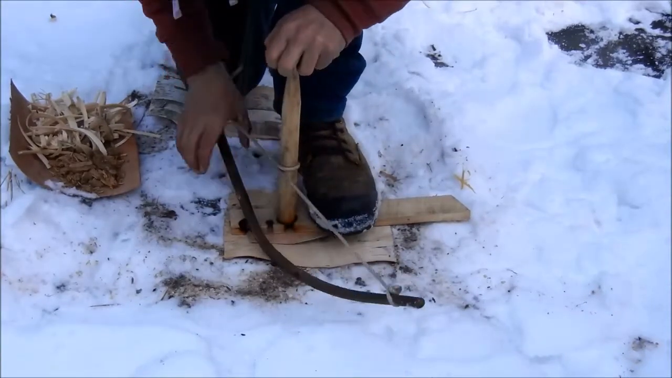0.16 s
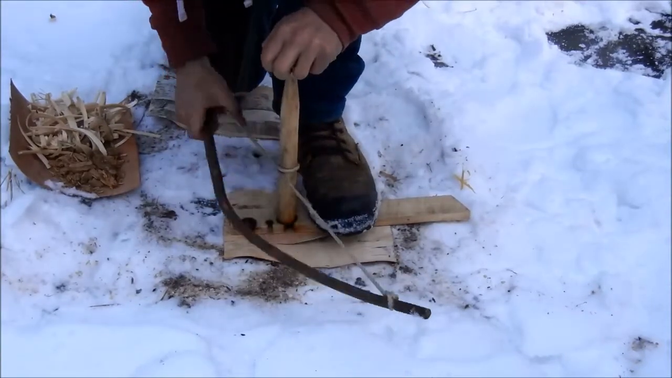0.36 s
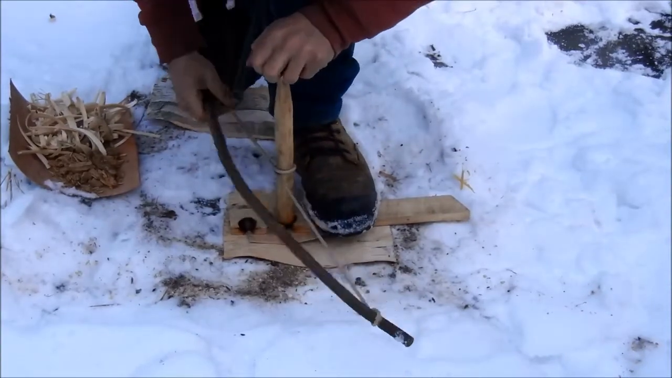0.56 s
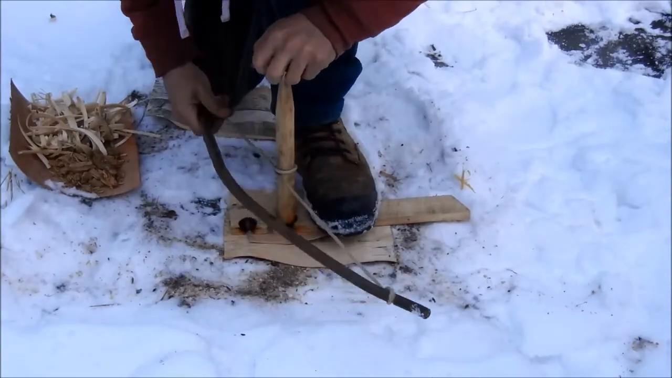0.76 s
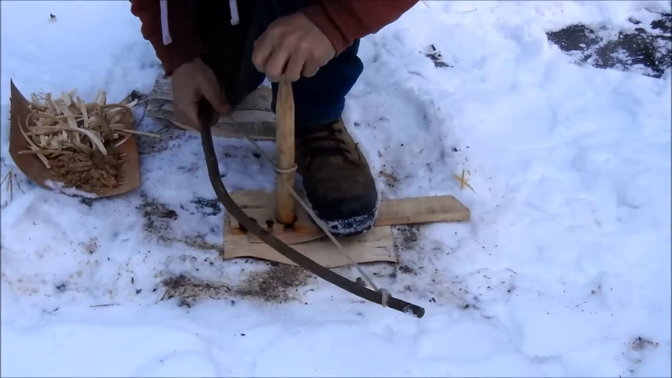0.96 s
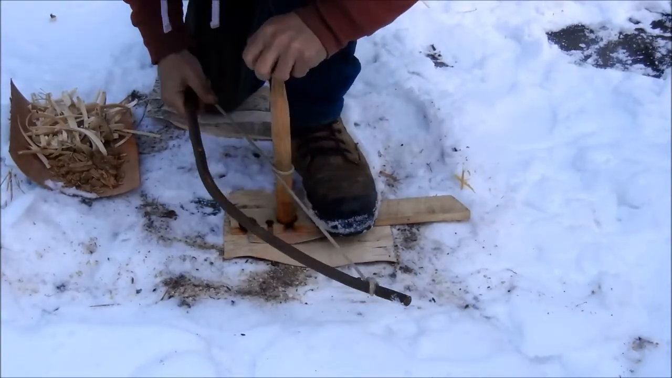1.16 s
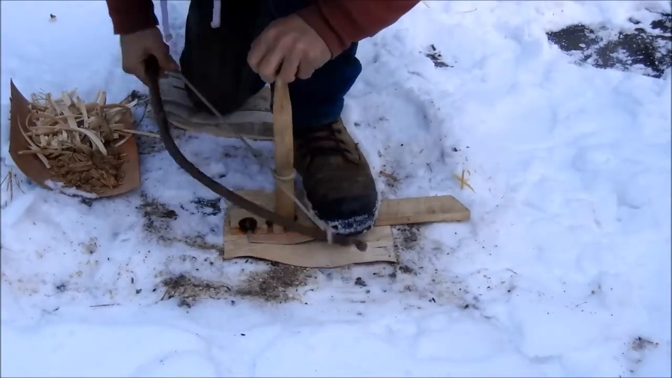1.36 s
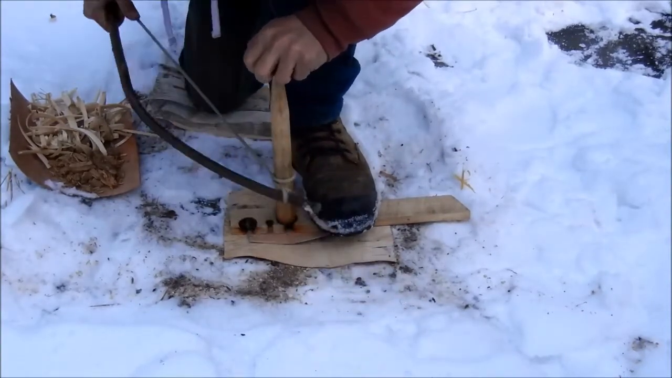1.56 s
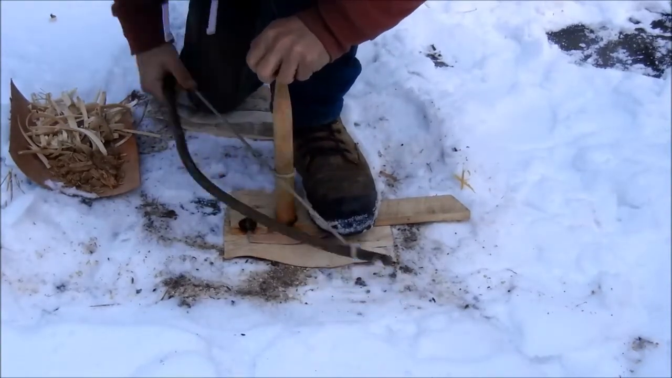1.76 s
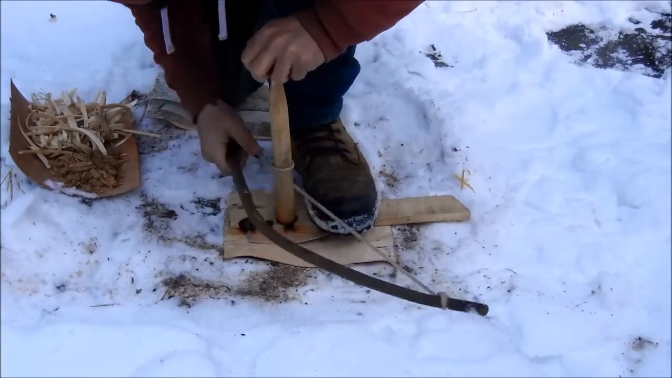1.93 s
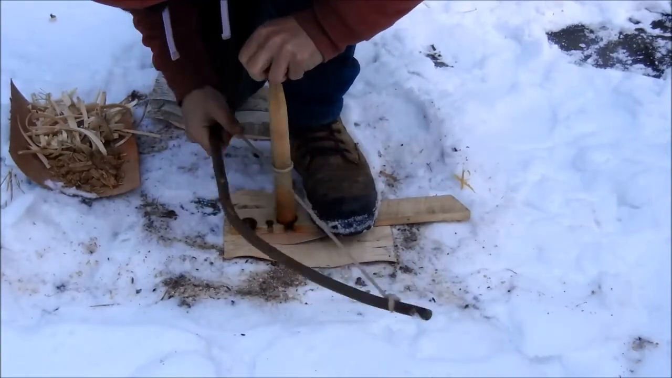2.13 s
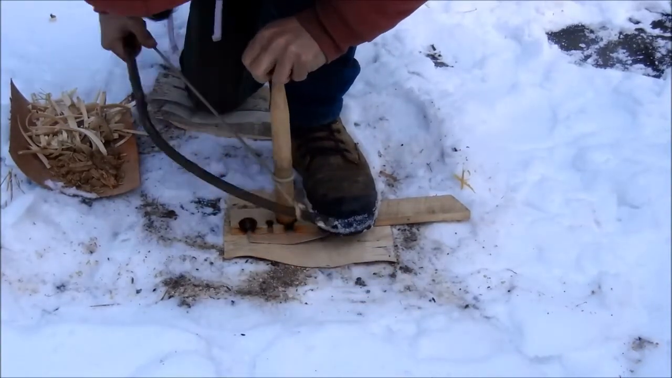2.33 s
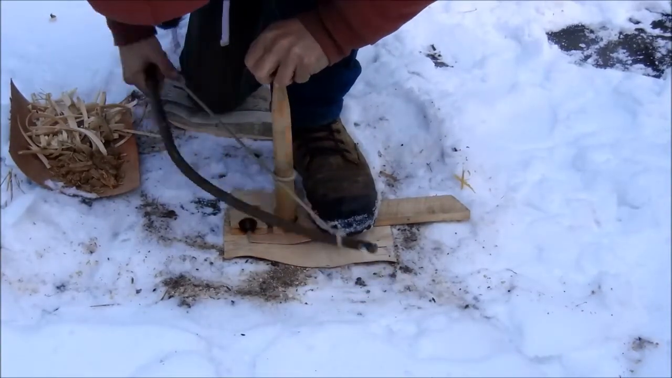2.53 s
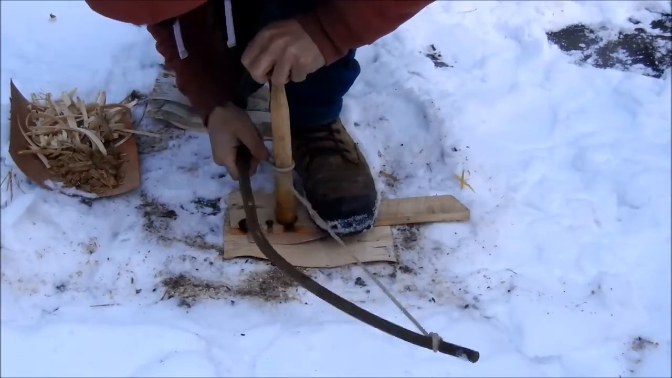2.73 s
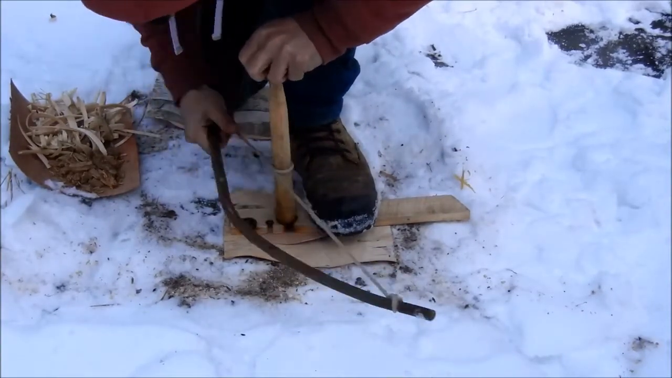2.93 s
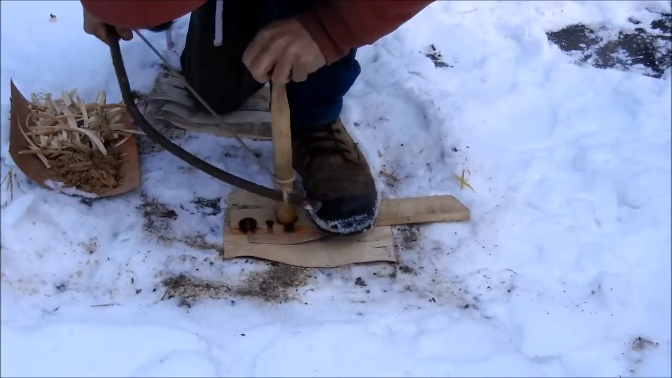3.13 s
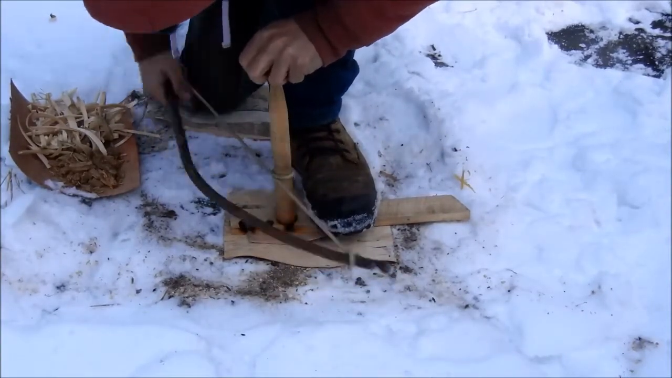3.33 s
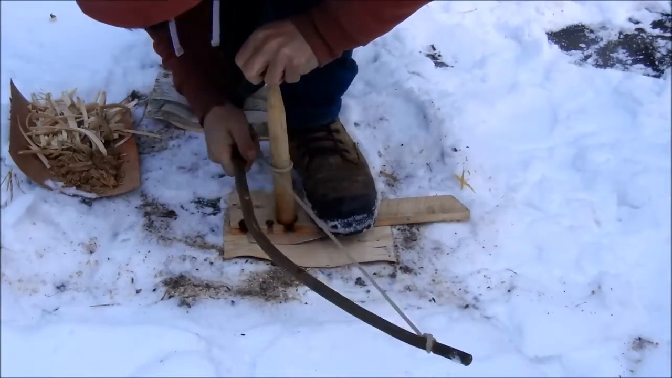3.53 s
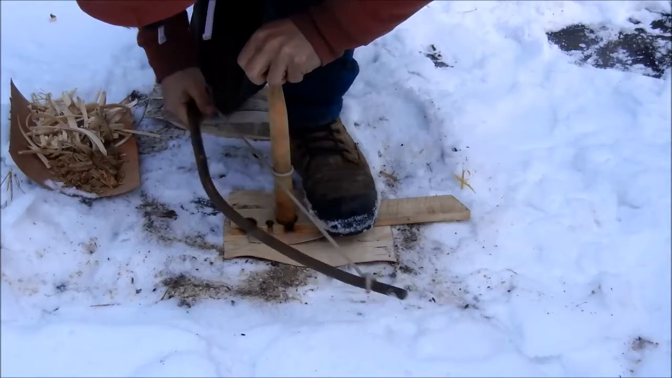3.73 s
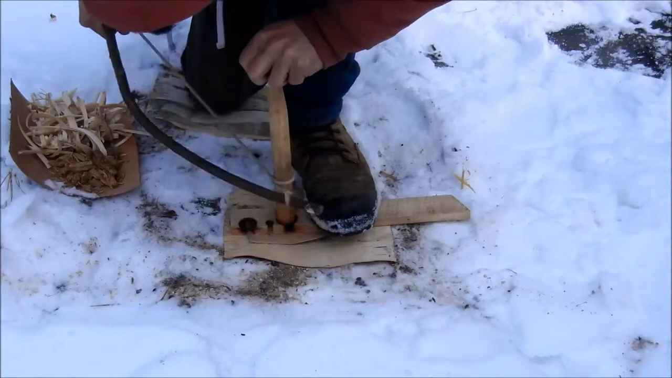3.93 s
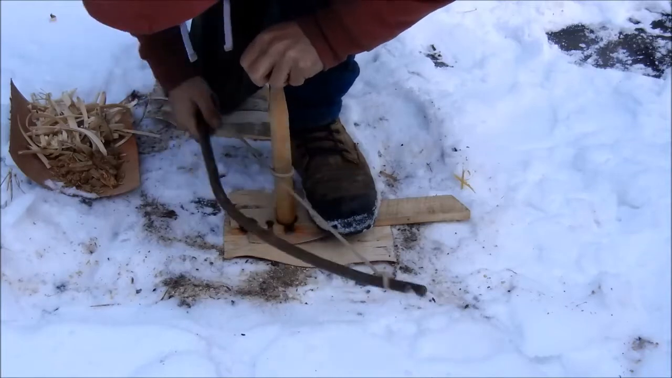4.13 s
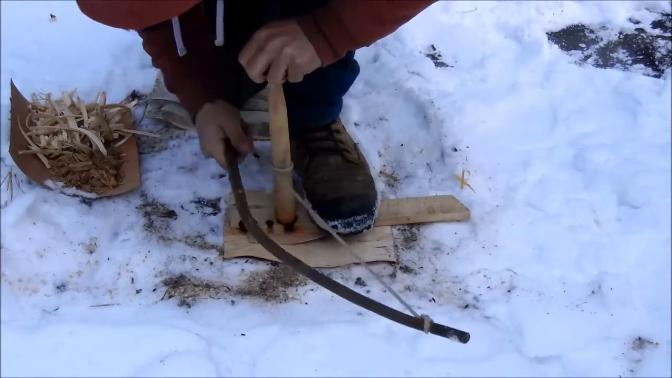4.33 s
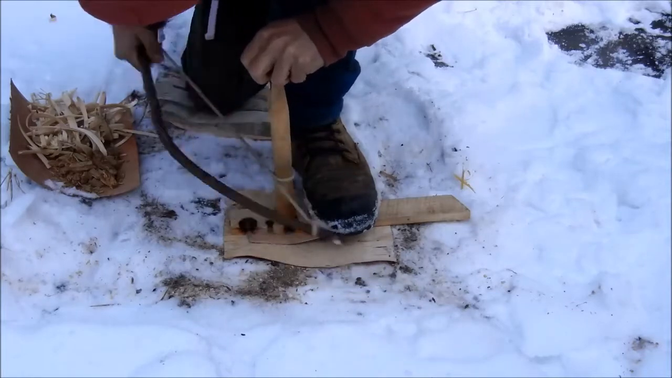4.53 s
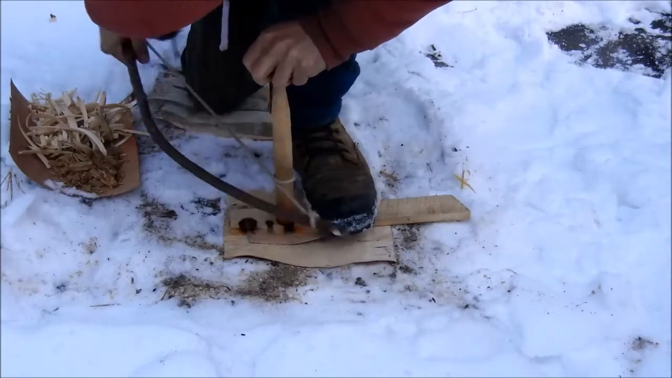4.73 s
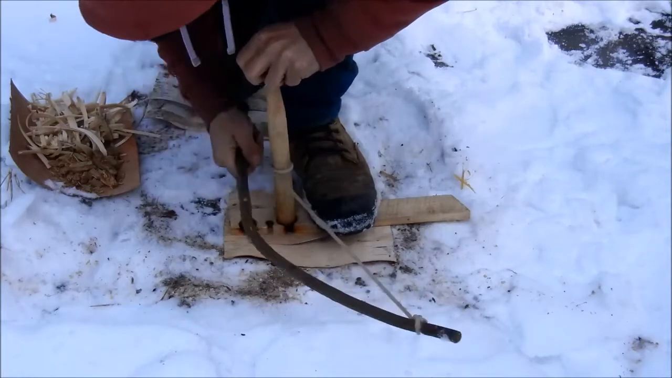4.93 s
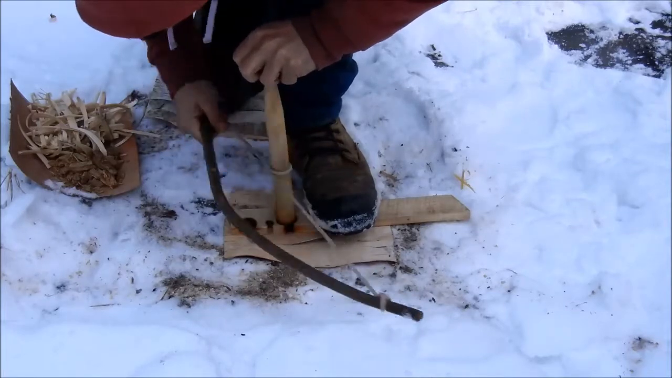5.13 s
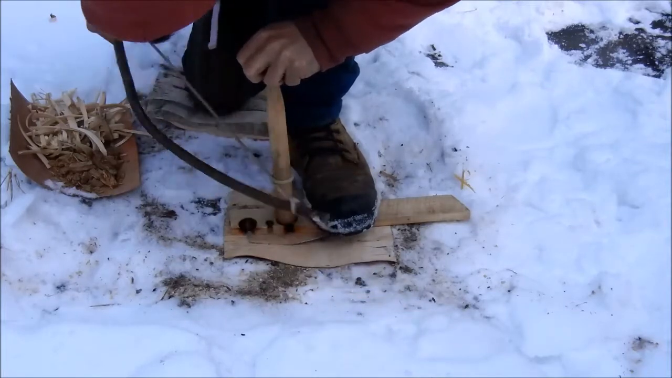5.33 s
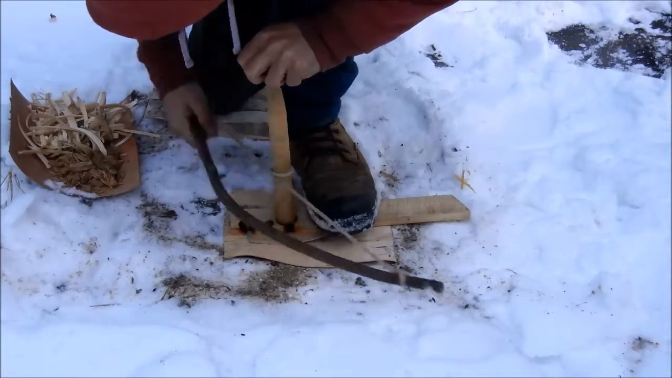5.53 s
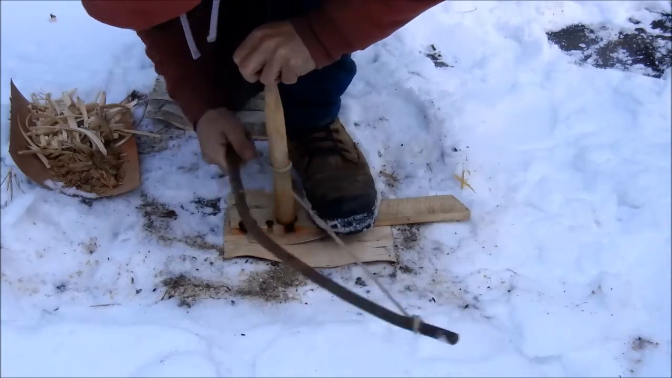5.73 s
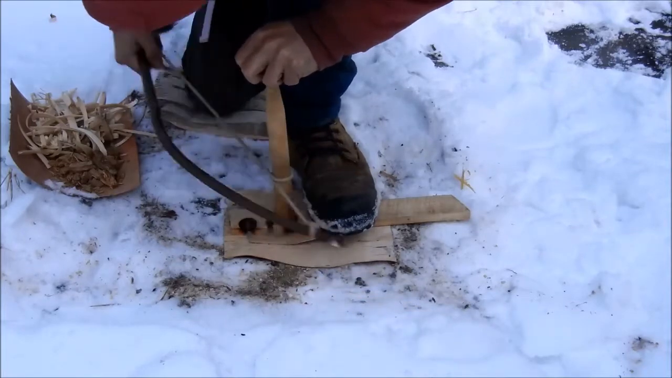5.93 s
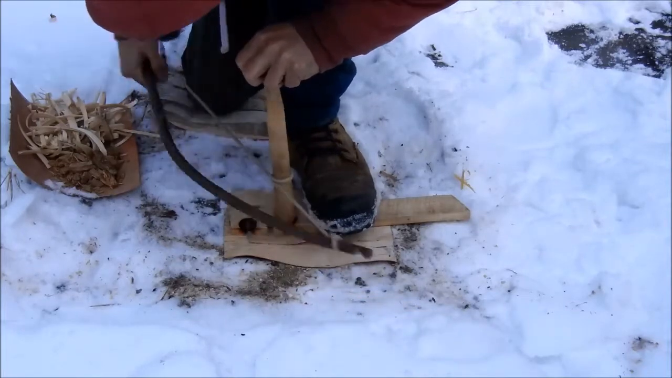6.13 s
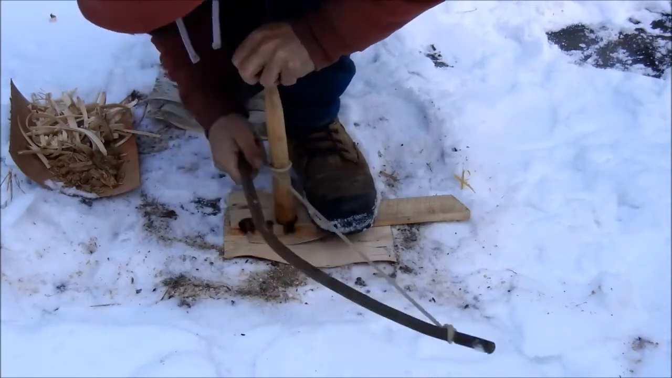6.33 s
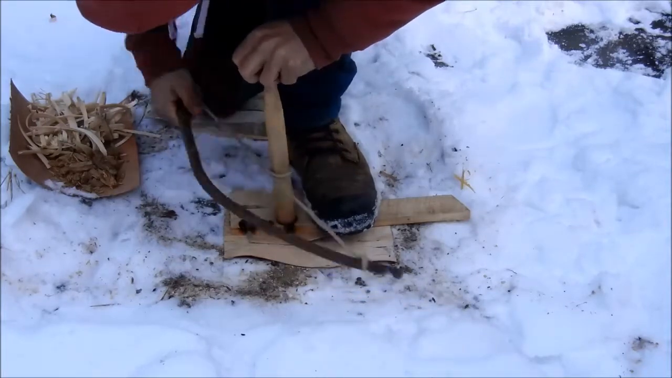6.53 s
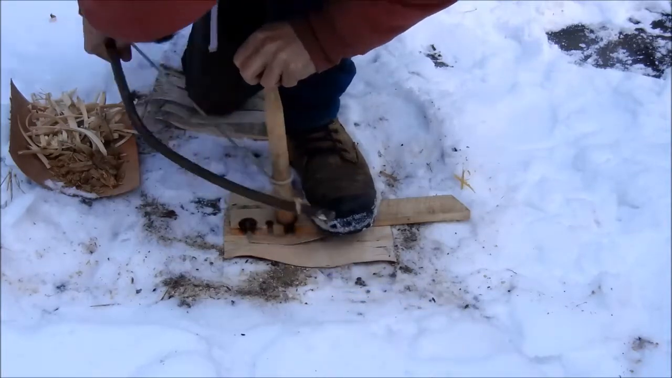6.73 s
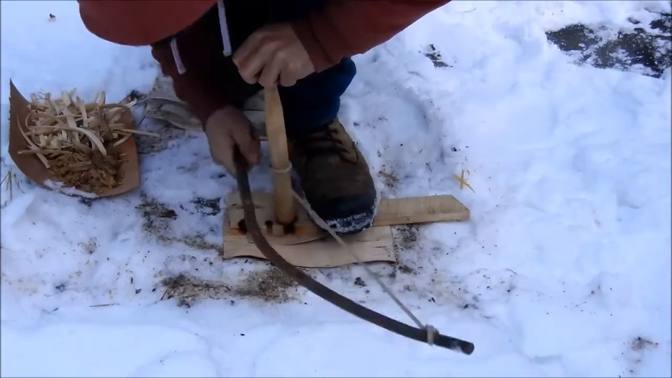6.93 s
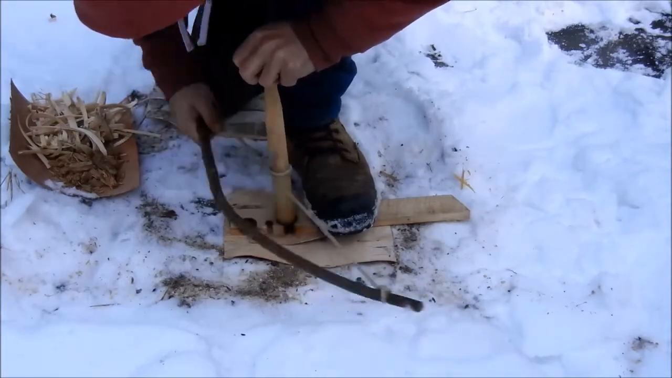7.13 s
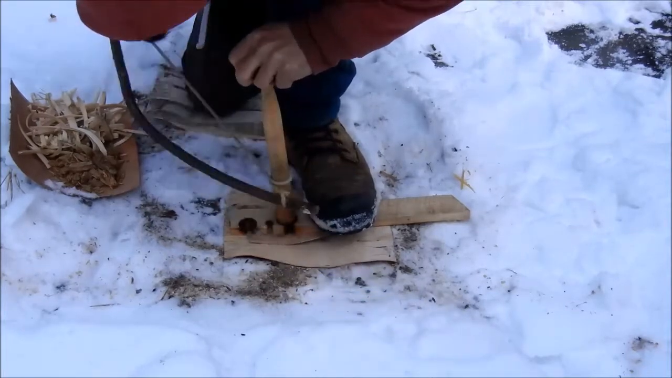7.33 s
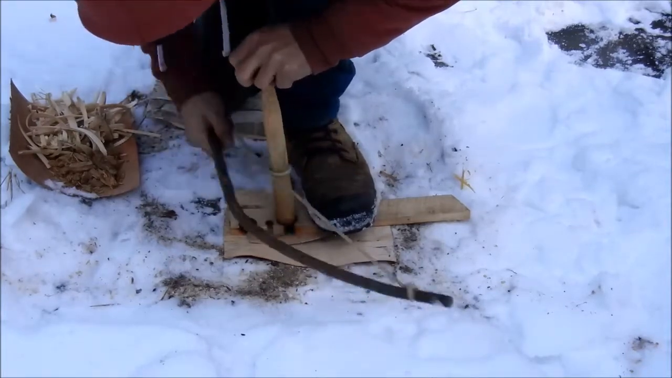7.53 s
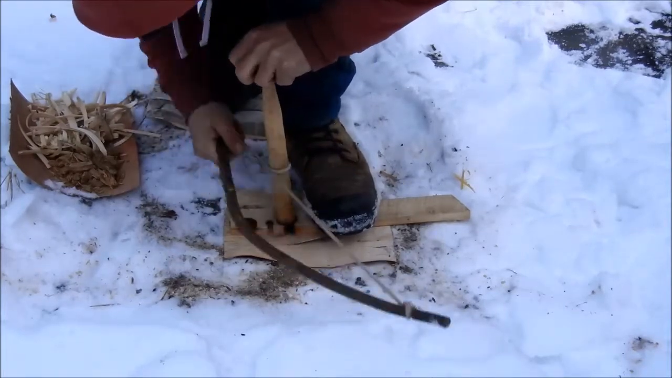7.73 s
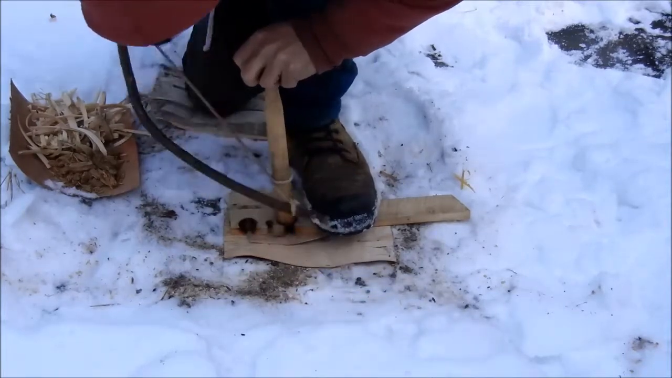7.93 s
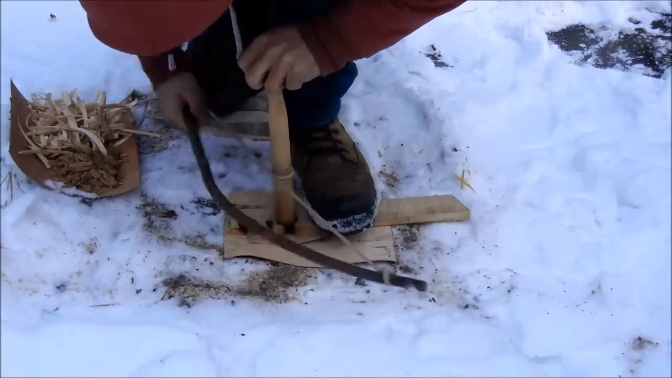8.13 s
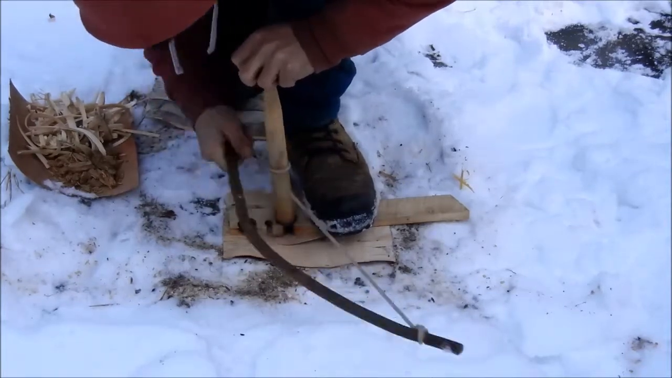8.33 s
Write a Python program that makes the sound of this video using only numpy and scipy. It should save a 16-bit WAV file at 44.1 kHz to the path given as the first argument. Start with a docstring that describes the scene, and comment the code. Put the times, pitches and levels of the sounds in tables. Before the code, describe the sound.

After faint sleeve rustle and small wooden knocks, a spindle grinds to and fro in a board outdoors, rasping rhythmically with brief stalls.

```python
"""Over faint open air a sleeve rustles and a wooden bow knocks in the hand; then it is eased into sawing to and fro.
A bow drill on a wooden hearth board in the snow: filtered noise grinds and hisses, stalling at each turn of the bow.
Charred grit cracks and knocks as short noise bursts; at the far end of a push the cord often slips with a tiny
squeak of wavering sines, and the taut cord hums low, gliding up, as the pull begins."""
import sys
import numpy as np
from scipy import signal
from scipy.fft import rfft, irfft
from scipy.io import wavfile
from scipy.ndimage import uniform_filter1d

SR = 44100
rng = np.random.default_rng(int(sys.argv[2]) if len(sys.argv) > 2 else 0)


def file_out(sig):
    """Save sig as 16-bit WAV at sys.argv[1]."""
    # one column per channel
    cols = np.atleast_2d(sig).T
    # limit, then scale
    lim = np.clip(cols, -1, 1)
    pcm = np.round(lim * 32767).astype(np.int16)
    wavfile.write(sys.argv[1], SR, pcm)


N = 373527
TIME = np.arange(N) / SR


def gain_of(db):
    """Turns decibels into an amplitude factor."""
    return 10 ** (np.asarray(db) / 20)


def evened(x):
    """Scales to rms 1."""
    return x / np.sqrt(np.mean(x ** 2) + 1e-20)


def read(points, hz):
    """Reads a spectrum on a log-frequency axis."""
    f, value = np.transpose(points)
    return np.interp(np.log(hz + 1), np.log(f + 1), value)


def add(mix, s, sound):
    """Mixes a sound in at time s."""
    part = mix[max(round(s * SR), 0):][:len(sound)]
    part += sound[:len(part)]


def wander(hz):
    """Random drift of rms 1, rolling off steeply above hz."""
    f = np.fft.rfftfreq(N, 1 / SR)
    spectrum = rfft(rng.standard_normal(N)) / (1 + (f / hz) ** 4)
    return evened(irfft(spectrum, N))


def colour(x, points, size=4096):
    """Rings x through a causal body of unit energy that has the given spectrum."""
    hz = abs(np.fft.fftfreq(size, 1 / SR))
    log_gain = np.log(gain_of(np.maximum(read(points, hz), -100)))
    minimum_phase = np.exp(np.conj(signal.hilbert(log_gain)))
    ring = np.fft.ifft(minimum_phase).real[:size // 2]
    return signal.oaconvolve(x, ring / np.linalg.norm(ring))[:N]


def stereo(mid, side, side_points):
    """Two microphone ports: a shared sound, and an unshared one of opposite sign in each."""
    hz = np.fft.rfftfreq(N, 1 / SR)
    side = irfft(rfft(side) * gain_of(read(side_points, hz)), N)
    return np.array([mid + side, mid - side])


def grains(per_s, spread_db, smooth):
    """Tiny fractures of unequal size over a bed of smooth sliding noise."""
    sizes = gain_of(spread_db * np.minimum(rng.exponential(1, N), 4)) * rng.choice([-1, 1], N)
    fractures = evened(sizes * (rng.random(N) < per_s / SR))
    return evened(fractures + smooth * rng.standard_normal(N))


def patches(shape, frames, bins):
    """Smooth random field of rms 1 over time and frequency."""
    field = rng.standard_normal(shape)
    for _ in range(2):
        field = uniform_filter1d(uniform_filter1d(field, frames, 0), bins, 1)
    return evened(field)


def crumble(decay_s, size=900):
    """One sharp burst, as of a grain collapsing, with a colour of its own and the energy of 2 ms at level 1."""
    t = np.arange(size) / SR
    tint = gain_of(2.9 * patches((1, size // 2 + 1), frames=1, bins=size // 20)[0])
    burst = irfft(rfft(rng.standard_normal(size)) * tint, size)
    attack = 1 - np.exp(-t / 0.000094)
    burst *= attack * (np.exp(-t / decay_s) + 0.13 * np.exp(-t / 0.0075))
    return burst / np.linalg.norm(burst) * np.sqrt(.002 * SR)


# colour of still outdoor air: f/Hz, level/dB [per Hz]
AIR_COLOUR = [(12, 3), (20, 3), (22, -25), (79, -2), (130, -9), (168, -8.5), (301, -12.5), (388, -15.5),
              (422, -12.5), (513, -11.5), (1190, -13.5), (1330, -11.5), (2530, -17.5), (14300, -30),
              (16000, -25.5)]
# side against mid for air and sleeve: f/Hz, level/dB
AIR_SIDE = [(50, -5.5), (200, -2.5), (2000, -1.5), (6000, 1.5)]
AIR_DB = -52  # rms of the shared part


def air():
    """A faint, steady outdoor background: noise in the colour of still air, partly unshared by the ports."""
    mid, side = (colour(rng.standard_normal(N), AIR_COLOUR) for _ in range(2))
    return gain_of(AIR_DB) * stereo(mid, side, AIR_SIDE)


# the sleeve rustling as the hand takes its grip: t/s, level/dB
SLEEVE_LEVEL = [(0, -51.5), (.08, -50.5), (.17, -51), (.33, -55.5), (.45, -54), (.53, -55), (.6, -53),
                (.8, -67), (1.1, -75)]
# colour of the cloth: f/Hz, level/dB [per Hz]
CLOTH_COLOUR = [(150, -6), (230, 1), (380, -6), (600, -4), (1400, 1), (1900, -1), (3000, 2), (3400, -7),
                (4000, -8), (4600, -25), (8000, -15), (16000, -16)]
# knocks as the bow is taken in hand: t/s, relative level/dB, f/Hz
BOW_KNOCKS = [(0.03, -32, 1140), (0.0575, -25.5, 660), (.547, -31, 1620), (.584, -25.5, 1840),
              (.597, -33, 2090), (0.664, -28, 2070), (0.695, -16.5, 1880), (0.701, -27, 650),
              (0.731, -37, 1550), (.791, -41, 1540)]
# what each knock rings with: multiple of its pitch [ratio], relative level/dB
KNOCK_MODES = [(1, 2.5), (1.41, -2), (1.98, -1), (3.7, -4)]
# dull bump of the board on the packed snow: t/s [start], peak level/dB, f/Hz
BOARD_BUMPS = [(3.142, -40, 70)]


def handling():
    """A rustling sleeve, quickly damped knocks of the wooden bow, and the board bumping on the snow."""
    out, scuff = np.zeros(N), np.zeros(N)
    t = np.arange(2000) / SR
    for s, db, hz in BOW_KNOCKS:
        age = t * hz / 0.85  # each knock lasts a few cycles
        ring = sum(gain_of(mode_db) * np.sin(2 * np.pi * hz * k * t)
                   for k, mode_db in KNOCK_MODES if hz * k < 3500)
        add(out, s, gain_of(db) * 1.35 * age * np.exp(-age) * ring)
        add(scuff, s, gain_of(db) * crumble(decay_s=.0015))
    bump_t = t[:len(t) // 2]
    for s, db, hz in BOARD_BUMPS:
        add(out, s, gain_of(db) * signal.windows.tukey(len(bump_t)) * np.sin(2 * np.pi * hz * bump_t))
    level = gain_of(np.interp(TIME, *np.transpose(SLEEVE_LEVEL)))
    rustle = level * grains(per_s=1700, spread_db=0.5, smooth=1.2)
    spread = np.roll(rustle, round(.01 * SR))  # the sleeve is broad, so it reaches the ports unequally
    sleeve = stereo(colour(rustle, CLOTH_COLOUR), 0.29 * colour(spread, CLOTH_COLOUR), AIR_SIDE)
    return out + 0.12 * colour(scuff, LIGHT_COLOUR) + sleeve


# strokes of the bow, a pull and a push in turn; the first two only ease it into motion:
# up to speed t/s, slowing down t/s, rise [dB per s], relative grinding level/dB, relative dust hiss level/dB,
# hardest pressing t/s, swell there level/dB
STROKES = [(0.688, 0.7, 270, -37, -50.5, .7, 1), (1.126, 1.185, 157, -43, -51, 1.16, 1),
           (1.349, 1.577, 290, -37, -46, 1.45, 4), (1.792, 2.008, 159, -28.5, -39, 1.88, 1),
           (2.193, 2.443, 228, -30.5, -41.5, 2.35, 2), (2.571, 2.823, 432, -31, -42, 2.71, 6),
           (2.977, 3.222, 250, -29.5, -40, 3.15, 4.5), (3.339, 3.572, 600, -29.5, -40.5, 3.48, 4),
           (3.739, 3.963, 170, -31, -41, 3.89, 4), (4.095, 4.315, 498, -30, -42, 4.24, 3.5),
           (4.458, 4.686, 197, -32, -42.5, 4.62, 5.5), (4.816, 5.03, 298, -31, -43.5, 4.95, 3.5),
           (5.162, 5.396, 202, -33, -42.5, 5.33, 3.5), (5.521, 5.727, 212, -31, -42.5, 5.65, 5),
           (5.856, 6.062, 245, -29, -38.5, 5.96, 0.5), (6.201, 6.407, 260, -32.5, -42.5, 6.33, 6.5),
           (6.523, 6.736, 280, -30, -40.5, 6.67, 2.5), (6.862, 7.053, 400, -31.5, -41, 6.97, 5),
           (7.17, 7.368, 258, -30.5, -42.5, 7.31, 2.5), (7.506, 7.705, 350, -30, -42, 7.64, 3),
           (7.817, 8.017, 302, -32, -43.5, 7.92, 3.5), (8.145, 8.34, 450, -31.5, -42.5, 8.26, 4),
           (8.453, 8.5, 280, -29, -39, 8.47, 1)]
# how a pull and a push go: fall [dB per s], held back before it breaks loose level/dB,
# change at the first jerk level/dB, spindle turns [per s], wobble of the hiss level/dB
PULLING = (474, 0.5, -2, 13.3, -0.1)
PUSHING = (580, 3, 1.04, 13, 0.53)
SWELL_S, BREAKAWAY_S = .063, 0.013  # half lengths of the pressing and of the first jerk
STALL_DB, STALL_HISS_DB = -70, -67.5  # relative; the tip still creeps in its socket while the bow turns round


def bowing():
    """Levels of grinding and hiss, and the share of pulling: each stroke speeds up, is pressed harder, and stalls."""
    sawing = TIME > STROKES[2][0]
    grind, hiss = (gain_of(db) ** 2 * sawing + 1e-12 for db in (STALL_DB, STALL_HISS_DB))
    pull = np.zeros(N)
    for k, (start, end, rise, grind_db, hiss_db, hardest, swell_db) in enumerate(STROKES):
        fall, held_db, jerk_db, turns_per_s, wobble_db = PUSHING if k % 2 else PULLING
        near = slice(int(start * SR) - SR // 4, int(end * SR) + SR // 4)
        t = TIME[near]
        shape_db = -rise * np.maximum(start - t, 0) - fall * np.maximum(t - end, 0)
        shape_db -= held_db * (t < start)
        shape_db += swell_db * np.exp(-((t - hardest) / SWELL_S) ** 2)
        shape_db += jerk_db * np.exp(-((t - start) / BREAKAWAY_S) ** 2)
        turning = np.cos(2 * np.pi * turns_per_s * (t - start))  # the tip is not quite round
        power = gain_of(grind_db + shape_db) ** 2
        grind[near] += power
        pull[near] += power * (1 - k % 2)
        hiss[near] += gain_of(hiss_db + shape_db + wobble_db * turning) ** 2
    return 10 * np.log10(grind), 10 * np.log10(hiss), np.clip(pull / grind, 0, 1)


# how the contact wears in: t/s, bright ring of the spindle level/dB, boom of the board level/dB
WEAR = [(.7, -5, -3), (1.3, 8, 1.5), (1.9, 3.5, 2), (3.1, 2.5, 2.5), (4.5, 1, 3.5), (5.8, 2, 3),
        (6.6, -0.5, 4), (8.1, 0.5, 7.5)]
# narrow resonances of spindle and board: centre f/Hz, half width f/Hz, mean lift level/dB
RINGS = [(655, 28, 6), (874, 17.5, 5), (1274, 17, 6), (1675, 39, 4), (2060, 65, 3.5), (2215, 36, 4),
         (2674, 38, 3), (3036, 65, 3), (3970, 220, 3)]


def shifting(mid, side, patchy_db, glide):
    """The contact wanders round the socket, so resonances glide, swell and fade."""
    hz, t, z = signal.stft(np.array([mid, side]), SR, nperseg=1024, noverlap=768)
    s, ring_db, boom_db = np.transpose(WEAR)
    shape = (len(t), len(hz))
    drift, swell = (patches((len(t), len(RINGS)), frames=14, bins=1) for _ in range(2))
    db = patches(shape, frames=7, bins=5) * patchy_db
    db += patches(shape, frames=4, bins=30) * patchy_db * .7
    for k, (centre, width, lift_db) in enumerate(RINGS):
        away = (hz - centre * (1 + glide * drift[:, [k]])) / width
        db += lift_db * (1 + 0.84 * swell[:, [k]]) * np.exp(-away ** 2)
    db += np.interp(t, s, ring_db)[:, None] * np.exp(-((hz - 2950) / 380) ** 4)
    db += np.interp(t, s, boom_db)[:, None] * np.exp(-((hz - 280) / 260) ** 2)
    return signal.istft(z * gain_of(db.T), SR, nperseg=1024, noverlap=768)[1][:, :N]


# colour of the wood when pushed, pulled and barely moving: f/Hz, level/dB [per Hz]
PUSH_COLOUR = [(71, -76), (120, -18.5), (205, -22), (250, -8), (406, -16), (540, -20.5), (861, 1),
               (1040, -4.5), (1350, -5.5), (1860, 1), (2350, -6), (2870, -2), (3280, -4), (3750, -12),
               (6500, -22.5), (8450, -70), (14300, -120)]
PULL_COLOUR = [(71, -56), (120, -14), (168, -14.5), (226, -2.5), (367, -8), (406, -22), (457, -7),
               (587, -16), (861, 2), (1370, -0.5), (1650, 3.5), (2470, 0), (3070, 1.5), (4350, -13.5),
               (6500, -23.5), (8450, -32), (14300, -120)]
LIGHT_COLOUR = [(120, -49), (200, -3.5), (571, -20.5), (871, -2.5), (1630, -0.5), (1940, -1), (2340, 3),
                (3090, 0), (3470, -8), (6500, -15), (8450, -54), (14300, -120)]
# colour of the dust hiss and of cracking grit: f/Hz, level/dB [per Hz]
DUST_COLOUR = [(2500, -25), (4500, 2), (7000, -0.5), (9500, 1), (12500, -3), (16000, -4)]
CRACK_COLOUR = [(2000, -21), (4000, -8), (7000, -2.5), (9500, 0.5), (12500, -0.5), (16000, -11.5)]
# side against mid for the drill: f/Hz, level/dB
DRILL_SIDE = [(230, -14), (500, -16), (900, -20), (1800, -25), (2400, -17.5), (3000, -19.5), (4400, -12),
              (8000, -8), (15000, -3)]
CRACKLE = 1.15  # strength of flaking char against the dust hiss


def spindle(grind_db, hiss_db, pulling):
    """Wood grinds on wood; the spindle leans to the other wall of its socket whenever the bow turns."""
    pressed = np.clip((grind_db + 43) / 12.45, 0, 1)  # slow, light rubbing hardly stirs the board's low modes
    shares = [(PUSH_COLOUR, pressed * (1 - pulling)), (PULL_COLOUR, pressed * pulling),
              (LIGHT_COLOUR, 1 - pressed)]
    catch = wander(hz=147)  # the tip catches and lets go unevenly
    lurch_db = 0.31 * wander(hz=25.4)  # the hand's pressure is never quite steady
    grind = gain_of(grind_db - 2.0 + 1.44 * catch + lurch_db)
    hiss = gain_of(hiss_db - 1.0 + 0.96 * catch + lurch_db)
    crackle = hiss * CRACKLE * np.clip(wander(hz=56) - .5, 0, 1.6)  # char flakes off in short clumps
    ports = []
    for _ in range(2):
        drive = grind * grains(per_s=5000, spread_db=0.5, smooth=0.88)
        wood = sum(colour(drive * np.sqrt(share), body) for body, share in shares)
        flakes = colour(crackle * grains(per_s=2200, spread_db=5.5, smooth=0.35), CRACK_COLOUR)
        dust = colour(hiss * grains(per_s=4300, spread_db=4.5, smooth=1.4), DUST_COLOUR)
        ports.append(wood + flakes + dust)
    return stereo(*shifting(*ports, patchy_db=1.6, glide=0.034), DRILL_SIDE)


# single bits of grit crushed under the spindle, loud and faint:
# t/s, relative crack level/dB, relative level/dB of the knock in the board
GRIT = [(1.479, -28.5, -21), (1.802, -32, -15), (2.008, -35, -42), (2.254, -30, -31), (2.381, -27.5, -14.5),
        (2.405, -30, -35), (2.563, -38, -44), (2.711, -25, -30), (3.015, -28, -20), (3.098, -22.5, -36),
        (3.156, -25, -17), (3.191, -28, -18), (3.229, -23.5, -25), (3.494, -27, -16), (3.758, -27.5, -42),
        (3.905, -34, -15), (4.005, -36, -40), (4.111, -27.5, -20), (4.48, -26, -28), (4.936, -33, -18),
        (5.346, -31, -15.5), (5.957, -38, -17.5), (6.265, -29, -27), (6.406, -28.5, -31),
        (6.526, -30.5, -17), (6.634, -30.5, -23), (6.924, -28, -32), (7.056, -21.5, -40), (7.268, -34, -20),
        (7.705, -30, -36), (8.076, -49, -38), (8.339, -25.5, -23)]
# a crumb cracks as a push breaks loose: set above that stroke's hiss and grinding
BREAKAWAY_CRACK_DB, BREAKAWAY_KNOCK_DB = 13, 8


def grit(grind_db, hiss_db, count=210):
    """Charred crumbs crack and knock the board; many more, at random, follow the strength of the stroke."""
    at = np.linspace(STROKES[2][0], TIME[-1], count) + .03 * rng.uniform(-1, 1, count)
    crack_size_db = 12.0 * rng.random(count) ** 3.7
    knock_size_db = 9 * rng.random(count) ** 1.5
    crumb_crack_db = np.interp(at, TIME, hiss_db) + crack_size_db + 0.95
    crumb_knock_db = np.interp(at, TIME, grind_db) + knock_size_db - 10.0
    crumbs = np.transpose([at, crumb_crack_db, crumb_knock_db])
    breakaways = [(start, hiss + BREAKAWAY_CRACK_DB, grind + BREAKAWAY_KNOCK_DB)
                  for start, _, _, grind, hiss, _, _ in STROKES[5::2]]  # pushes from the sixth stroke on
    cracks, knocks = np.zeros((2, N)), np.zeros((2, N))
    for start, crack_db, knock_db in list(GRIT) + breakaways + list(crumbs):
        for port in range(2):
            add(cracks[port], start, gain_of(crack_db) * crumble(decay_s=0.00043))
            add(knocks[port], start, gain_of(knock_db) * crumble(decay_s=0.0045))
    ports = [gain_of(2.5) * colour(c, CRACK_COLOUR) + gain_of(-2.0) * colour(k, PUSH_COLOUR)
             for c, k in zip(cracks, knocks)]
    return stereo(*ports, DRILL_SIDE)


# the cord slipping on the spindle: t/s, relative level/dB, f/Hz, relative length t/s
SLIPS = [(2.058, -14, 2620, 0.0029), (2.859, -20.5, 2600, 0.0059), (3.629, -21.5, 2560, 0.0021),
         (4.3678, -22.5, 2760, 0.0092), (5.078, -20.5, 2950, 0.012), (5.777, -17.5, 2710, 0.011),
         (6.4537, -17.5, 2766, 0.021), (7.1012, -25.5, 2580, 0.0042)]
# the taut cord humming: loudest t/s, relative level/dB, middle f/Hz, length t/s
HUMS = [(2.342, -43, 249, 0.095), (2.967, -39, 248, 0.085), (4.511, -43.5, 246, 0.12),
        (5.827, -32.5, 231, .1), (6.492, -27.5, 237, 0.08), (6.583, -37.5, 237, 0.1),
        (7.142, -30, 240, 0.086), (7.2, -37, 230, 0.074), (7.787, -34, 236, 0.061)]


def cord():
    """Brief stick-slip squeaks that jolt the wood, and the low hum of the stretched cord."""
    out, rasp = np.zeros(N), np.zeros(N)
    t = np.arange(2000) / SR
    for s, db, hz, length in SLIPS:
        fade = np.exp(-(t / (0.46 * length)) ** 2) + 0.068 * np.exp(-t / 0.0087)
        shape = gain_of(db) * (1 - np.exp(-t / 0.0003)) * fade
        waver = evened(uniform_filter1d(rng.standard_normal(len(t)), size=30))
        phase = 2 * np.pi * np.cumsum(hz * (1 + 0.038 * waver)) / SR
        squeak = np.sin(phase) + 0.059 * np.sin(2 * phase) + 0.13 * np.sin(3 * phase)
        wood = 0.49 * np.sin(2 * np.pi * 2310 * t) + 0.12 * np.sin(2 * np.pi * 1000 * t)
        add(out, s, shape * (squeak + wood))
        add(rasp, s, shape * rng.standard_normal(len(t)))
    for s, db, hz, length in HUMS:
        swell = signal.windows.hann(int(length * SR))
        tension = 1 + 0.033 * np.linspace(-1, 1, len(swell))  # the pull tightens the cord
        phase = 2 * np.pi * np.cumsum(hz * tension) / SR
        hum = np.sin(phase) + 0.084 * np.sin(2 * phase)
        add(out, s - length / 2, gain_of(db) * swell * hum)
    return out + 0.46 * colour(rasp, LIGHT_COLOUR) + 0.14 * colour(rasp, CRACK_COLOUR)


def scene():
    """Air and handling, then the drill driven by the strokes of the bow."""
    grind_db, hiss_db, pulling = bowing()
    drill = spindle(grind_db, hiss_db, pulling) + grit(grind_db, hiss_db) + cord()
    return air() + handling() + drill


# left against right: f/Hz, level/dB
BALANCE = [(200, 0), (4400, -.5), (8000, 0.4), (14000, -2.5)]
EDGE_HZ = 16000  # upper band limit


def record(dry):
    """The right port is a little brighter at the very top; then the band limit."""
    tilt_db = read(BALANCE, np.fft.rfftfreq(N, 1 / SR)) / 2
    ports = irfft(rfft(dry) * gain_of([tilt_db, -tilt_db]), N)
    low_pass = signal.firwin(511, EDGE_HZ, window=("kaiser", 9), fs=SR)
    return signal.oaconvolve(ports, low_pass[None], "same")


dry = scene()
out = record(dry)
file_out(out)
```